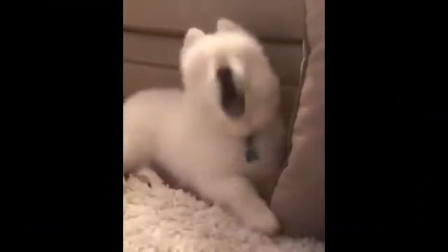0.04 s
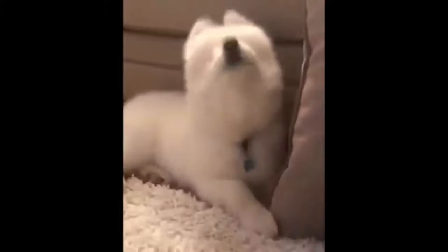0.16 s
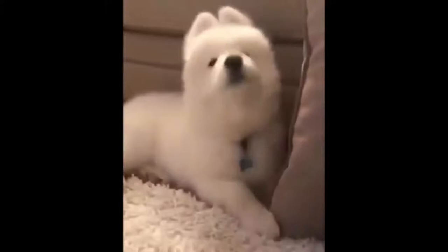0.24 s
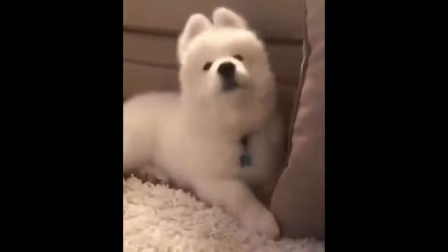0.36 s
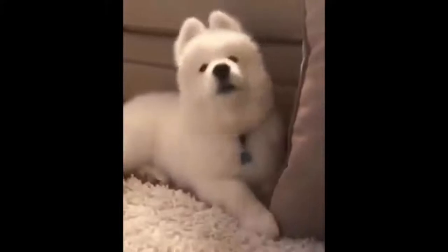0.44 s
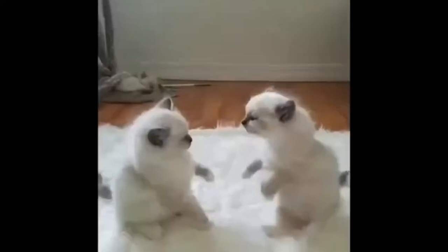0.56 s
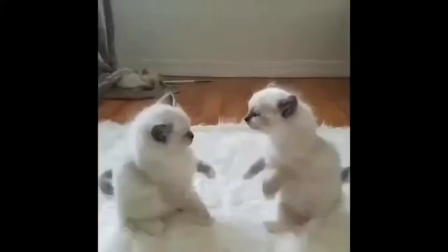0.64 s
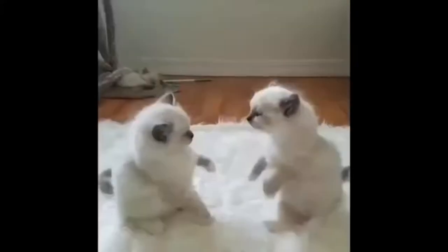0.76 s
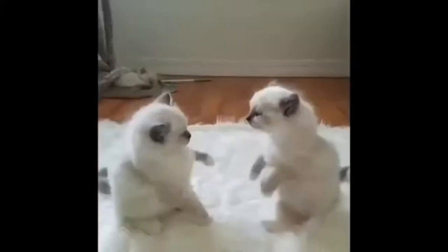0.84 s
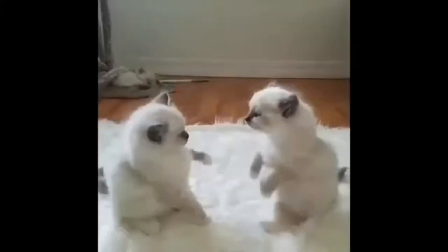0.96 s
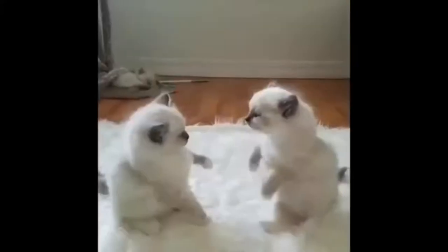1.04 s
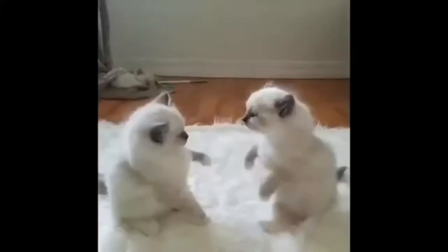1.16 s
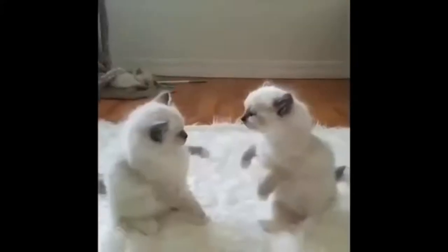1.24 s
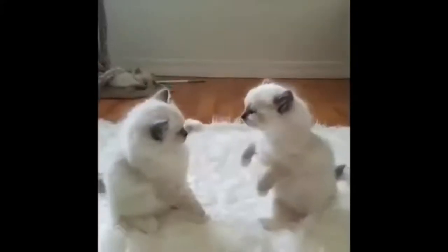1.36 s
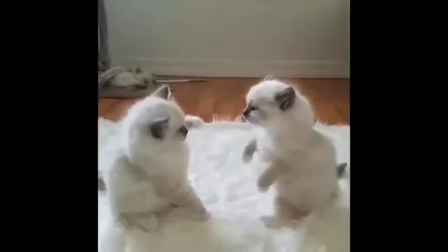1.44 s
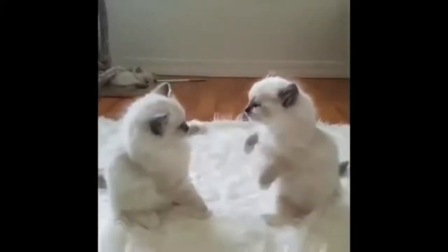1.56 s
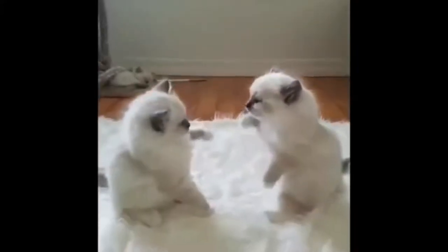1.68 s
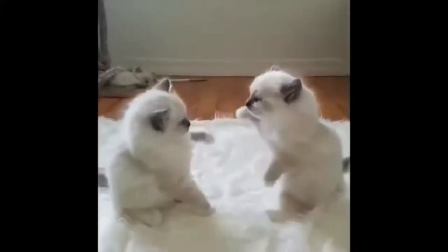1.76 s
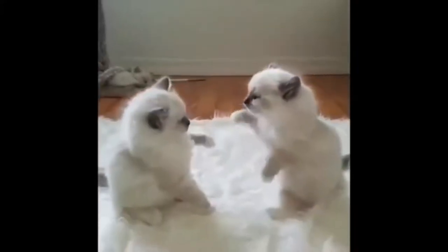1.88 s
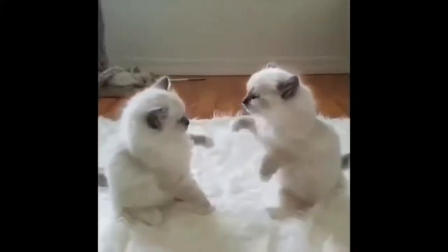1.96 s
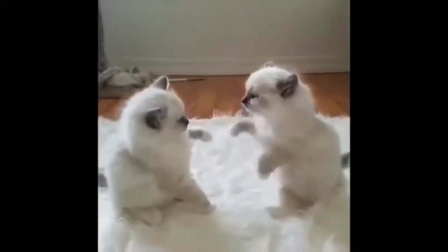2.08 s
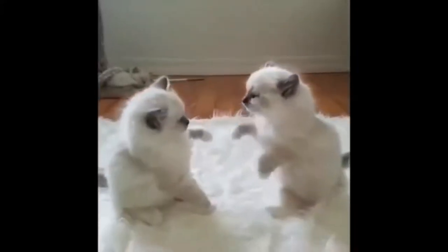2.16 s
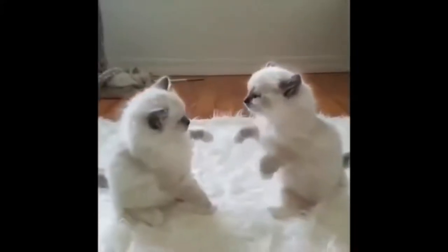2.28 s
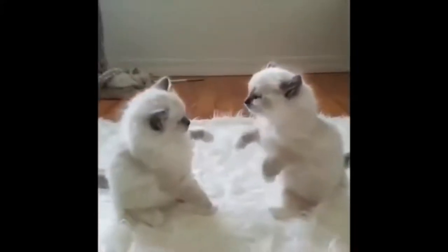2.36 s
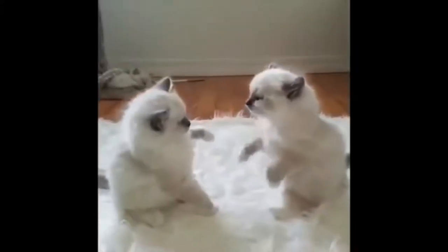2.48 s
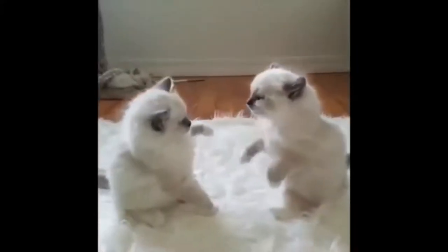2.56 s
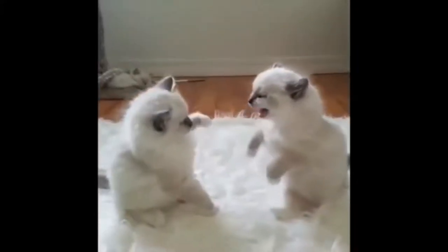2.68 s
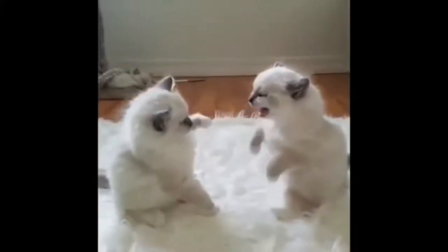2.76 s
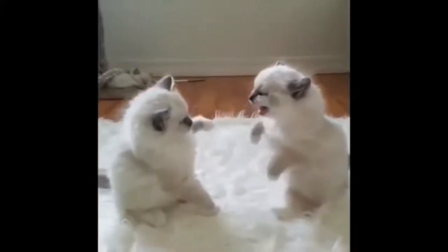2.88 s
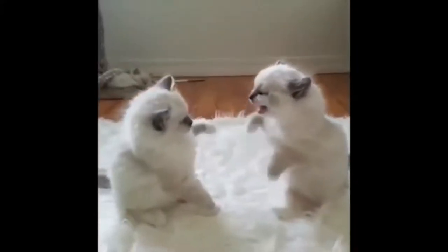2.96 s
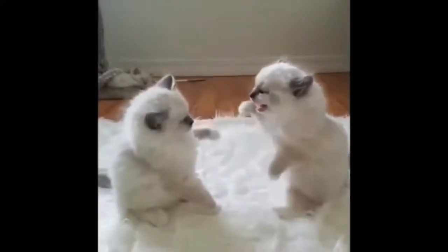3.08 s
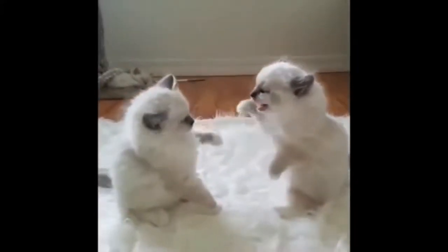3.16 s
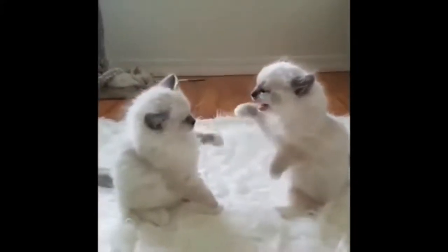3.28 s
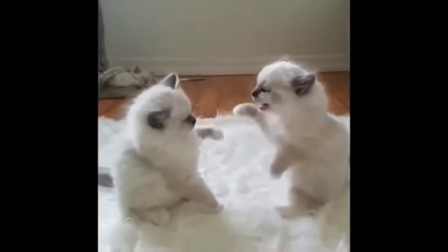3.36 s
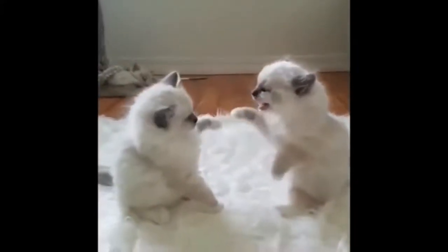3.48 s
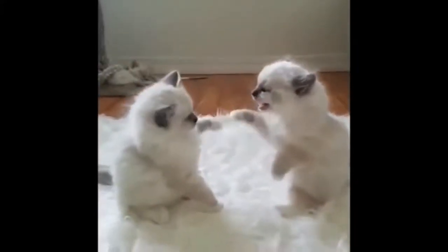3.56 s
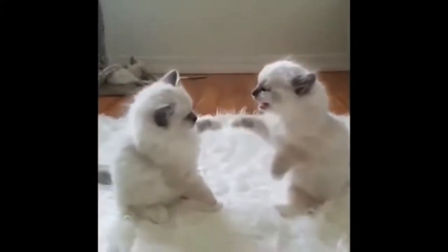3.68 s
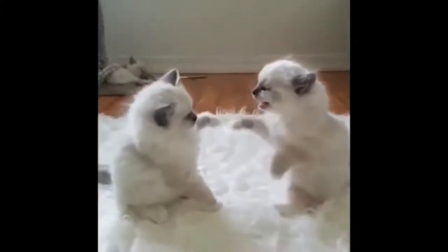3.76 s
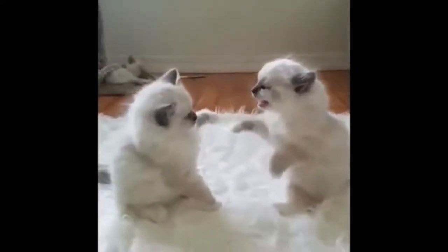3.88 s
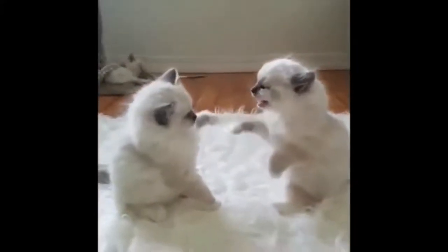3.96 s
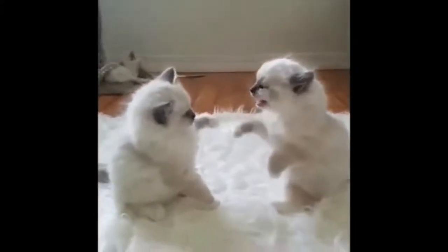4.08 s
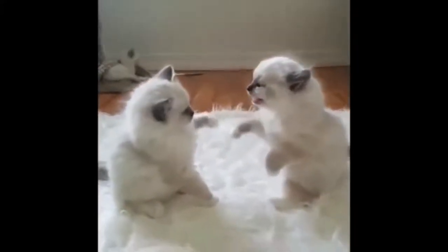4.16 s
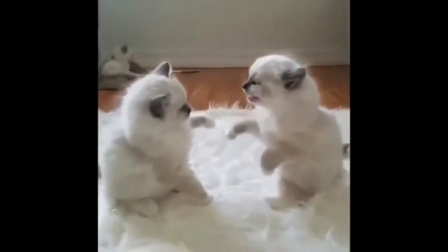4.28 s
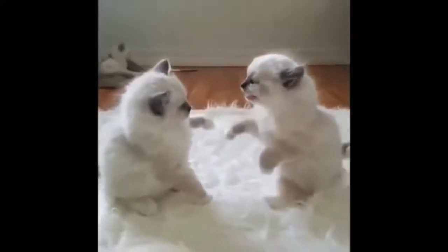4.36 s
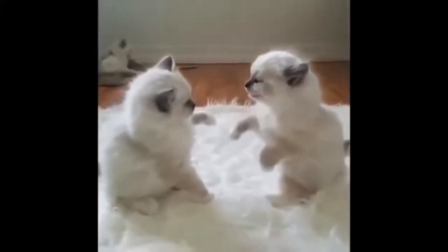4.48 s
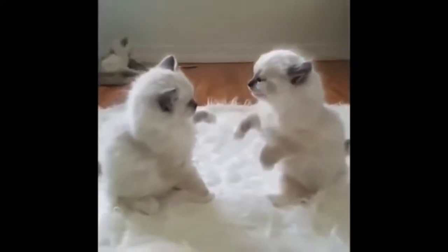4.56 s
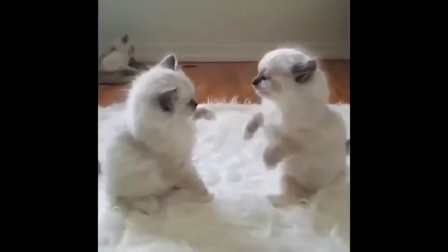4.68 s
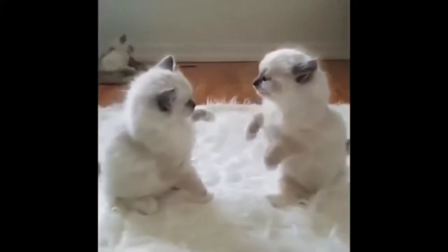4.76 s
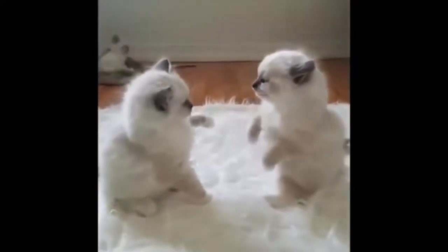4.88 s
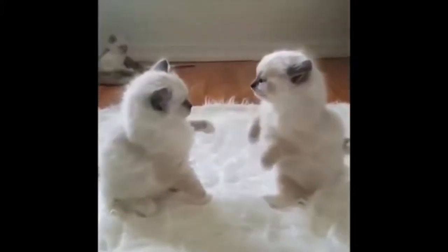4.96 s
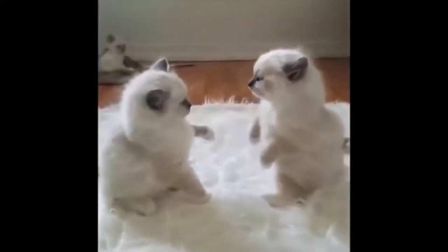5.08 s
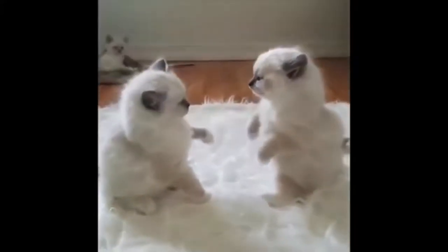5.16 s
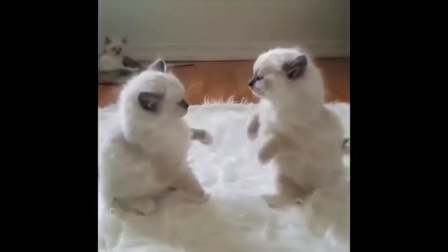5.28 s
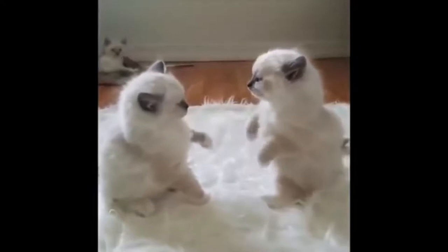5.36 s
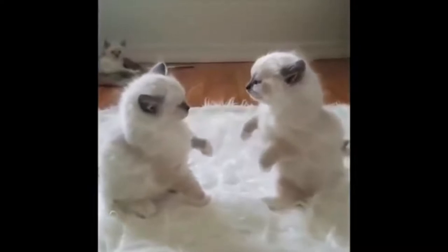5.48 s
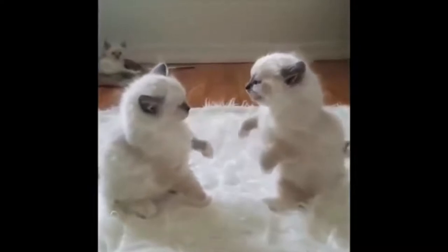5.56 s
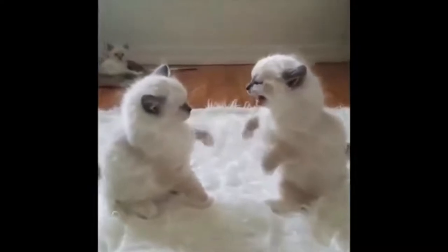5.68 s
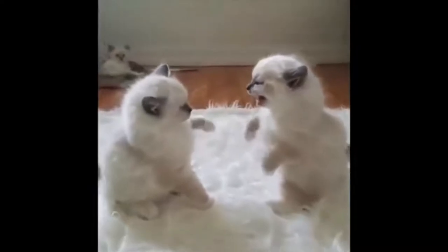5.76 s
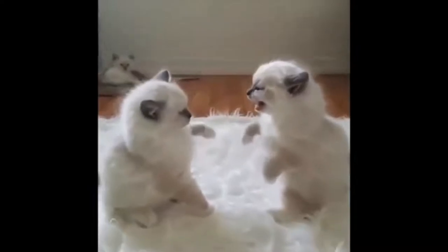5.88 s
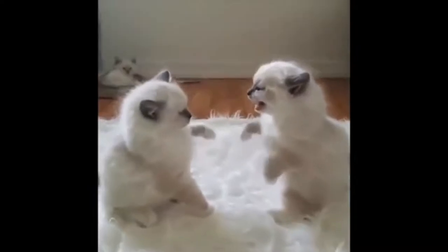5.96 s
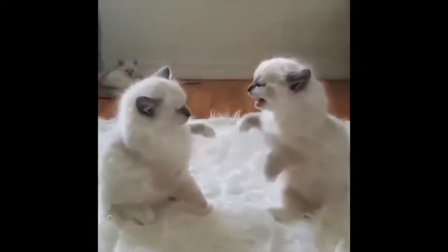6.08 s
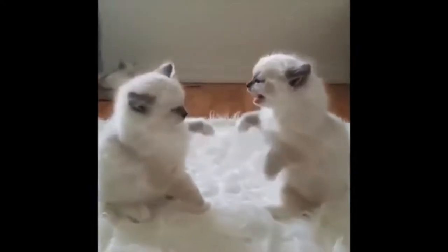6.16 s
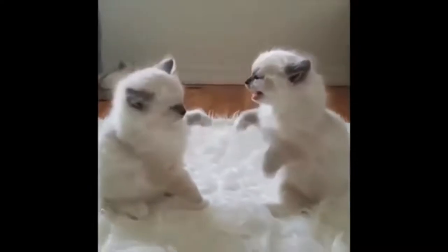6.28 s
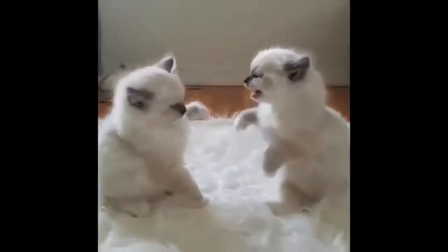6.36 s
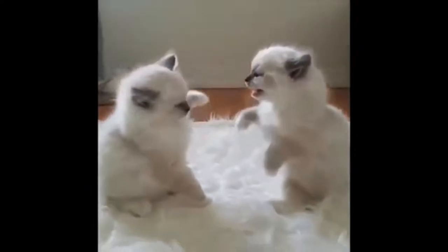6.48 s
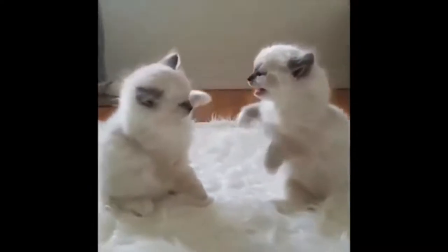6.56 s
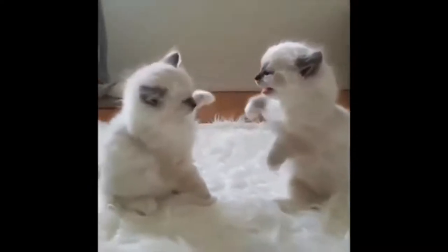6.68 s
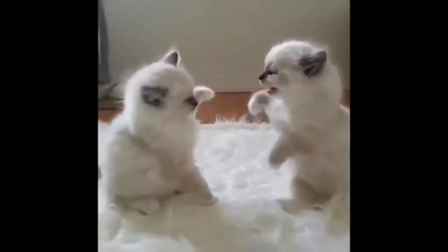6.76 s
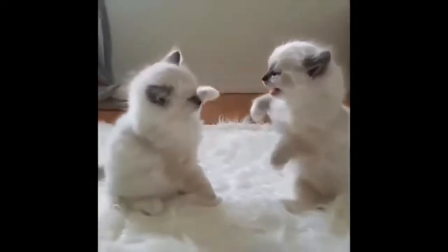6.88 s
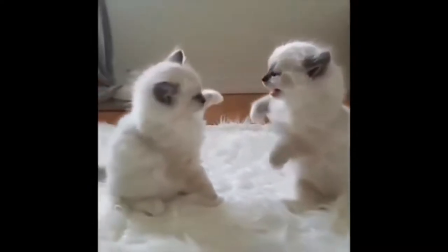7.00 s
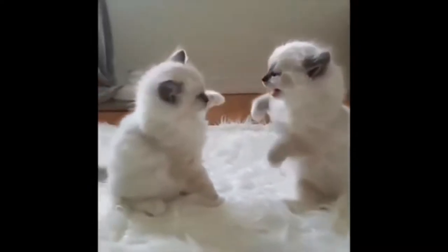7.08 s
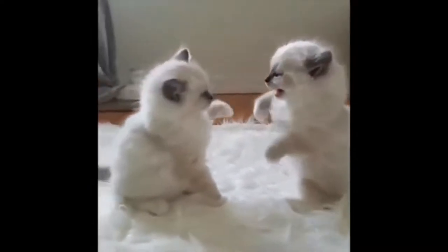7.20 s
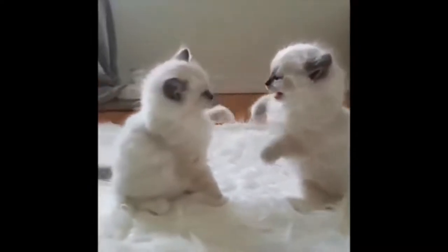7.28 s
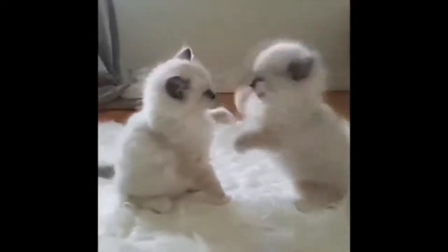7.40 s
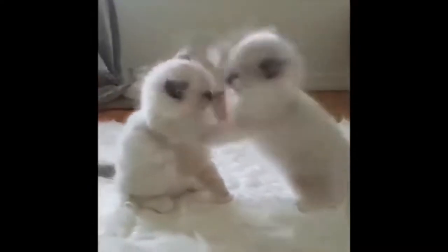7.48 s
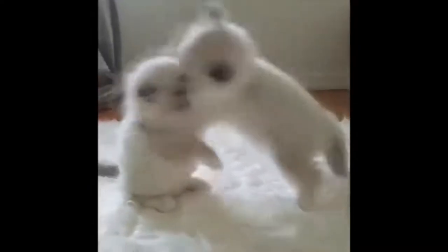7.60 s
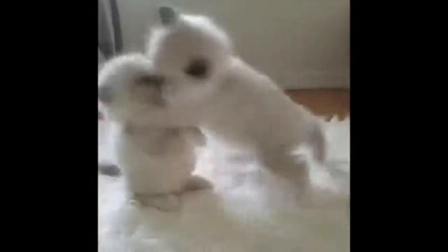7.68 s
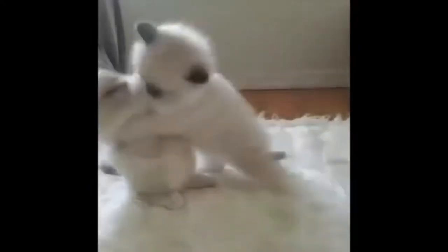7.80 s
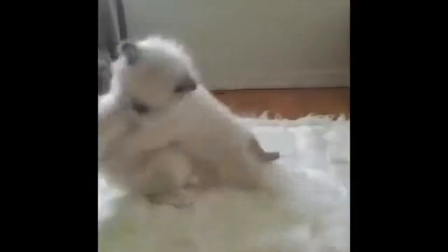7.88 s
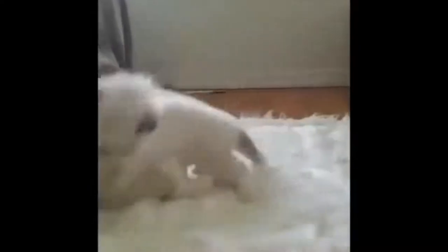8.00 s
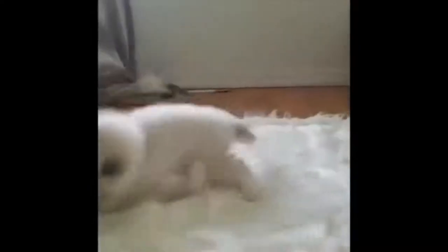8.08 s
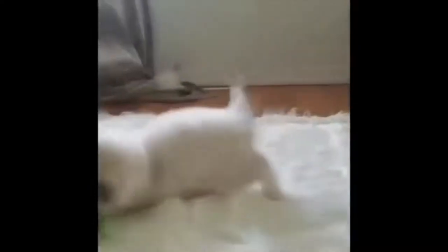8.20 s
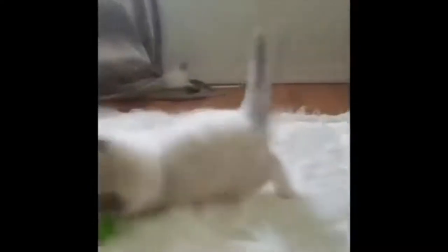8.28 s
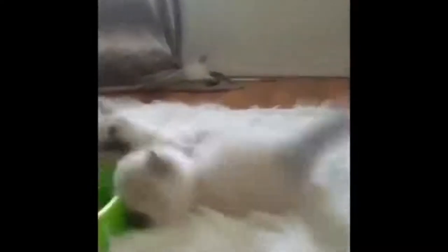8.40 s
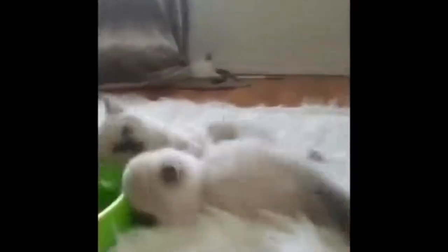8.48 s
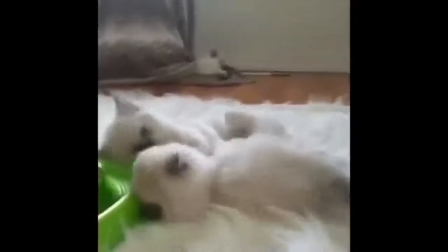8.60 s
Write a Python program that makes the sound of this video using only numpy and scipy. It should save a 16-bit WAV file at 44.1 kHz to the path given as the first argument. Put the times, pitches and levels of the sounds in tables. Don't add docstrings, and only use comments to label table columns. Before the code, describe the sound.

A puppy gives one very loud, short yip that breaks upward; after a brief silence, two faint kitten mews, soft paw pats and a floor thump.

```python
import sys
import numpy as np
from scipy import signal
from scipy.fft import rfft, irfft
from scipy.io import wavfile
from scipy.ndimage import uniform_filter1d, minimum_filter1d

SR = 44100
rng = np.random.default_rng(int(sys.argv[2]) if len(sys.argv) > 2 else 0)


def convert_level_to_amplitude(level_db):
    exponent = np.asarray(level_db, float) / 20
    return 10 ** exponent


def generate_wav(sig):
    pcm = np.round(np.clip(np.atleast_2d(sig).T, -1, 1) * 32767).astype(np.int16)
    wavfile.write(sys.argv[1], SR, pcm)


N = 380731
TIME = np.arange(N) / SR
CUT_START_S, CUT_END_S = .686, .763


def on_log(hz, table):
    f, v = np.transpose(table)
    return np.interp(np.log(np.maximum(hz, 1)), np.log(f), v)


def colour(x, table):
    gain = convert_level_to_amplitude(on_log(np.fft.rfftfreq(x.shape[-1], 1 / SR), table))
    y = irfft(rfft(x) * gain, x.shape[-1])
    return y / y.std()


def band(x, hz, width, order=1):
    edges = max(hz - width / 2, hz / 4), min(hz + width / 2, .45 * SR)
    return signal.sosfilt(signal.butter(order, edges, "band", fs=SR, output="sos"), x)


def walk(rate):
    k = int(SR / rate)
    held = np.repeat(rng.standard_normal(N // k + 1), k)
    return 1.1 * uniform_filter1d(uniform_filter1d(held, k), k)[:N]


def swells(rows):
    return sum(db * np.exp(-((TIME - s) / length) ** 2) for s, length, db in rows)


def add(out, s, x, pan_db=0.):
    i = int(s * SR)
    x = x[:N - i]
    out[:, i:i + len(x)] += x * convert_level_to_amplitude(np.array([[pan_db], [-pan_db]]) / 2)


def room(x, t60, gap_s, dull_hz, channels):
    t = np.arange(int(.9 * SR)) / SR
    noise = rng.standard_normal((channels, len(t)))
    bass = signal.lfilter(*signal.butter(1, 450., fs=SR), noise)
    noise = noise - bass + bass[0]
    low = signal.lfilter(*signal.butter(1, dull_hz, fs=SR), noise)
    tail = low * convert_level_to_amplitude(-60 * t / t60) + (noise - low) * convert_level_to_amplitude(-120 * t / t60)
    tail = tail * np.clip(t / gap_s, 0, 1) ** 2
    energy = (low ** 2 * convert_level_to_amplitude(-120 * t / t60)).sum(1, keepdims=True)
    return signal.fftconvolve(x[None], tail / np.sqrt(energy), axes=1)[:, :N]


def tap(db, hz, width, edge_db):
    t = np.arange(2000) / SR
    ring = band(np.sin(2 * np.pi * hz * t) * np.exp(-np.pi * width * hz * t), hz, 4 * hz)
    edge = band(rng.standard_normal(2000) * np.exp(-1050 * t), 3 * hz, 1.6 * hz, order=2)
    return convert_level_to_amplitude(db) * (ring / np.abs(ring).max() + convert_level_to_amplitude(edge_db) * edge / np.abs(edge).max())


def whistles(rows):
    out = 0
    for s, hz, db, half, glide in rows:
        t = TIME - s
        bend = glide * np.clip(t, -2 * half, 2 * half) ** 2 / 2 + .07 * walk(150)
        envelope = convert_level_to_amplitude(db + 3.5 * walk(150)) * np.exp(-(t / half) ** 2)
        out = out + envelope * np.sin(2 * np.pi * (hz * t + bend))
    return out


def voice(table, wobble, shimmer_db, rate, count, tract, attack, release):
    s, *columns = np.transpose(table)
    hz, level_db, *shape = (np.interp(TIME, s, c) for c in columns)
    phase = 2 * np.pi * np.cumsum(hz * (1 + wobble * walk(rate))) / SR
    out = 0
    for k in range(1, count + 1):
        shimmer = shimmer_db * (walk(rate) + .4 * walk(rate / 4))
        db = level_db + tract(k, k * hz, *shape) + shimmer
        out = out + convert_level_to_amplitude(db) * np.sqrt(2) * np.sin(k * phase - .15 * (k - 1))
    edges = np.clip(np.minimum((TIME - s[0]) / attack, (s[-1] - TIME) / release) + .5, 0, 1)
    return out * edges, np.cos(phase) * edges


# f/Hz, level/dB per Hz
BEDROOM_SPECTRUM = [(15, -56), (25, -26.5), (124, -2.5), (153, -14), (245, -5), (287, -18.5), (318, 2.5),
                    (403, -32.5), (681, -22.5), (737, -28.5), (2460, -23.5), (4620, -32.5), (13200, -38.5)]
# f/Hz, likeness (0-1)
LIKENESS = [(60, 0.97), (130, 0.94), (280, 0.66), (610, 0), (1330, -0.17), (2870, 0.02), (6230, -0.01),
            (13500, 0.05)]
# f/Hz, level/dB
HUM = [(86, -64), (120, -61.5), (425, -73)]
# t/s, length/s, level/dB
STIRS = [
    (1.41, 0.15, 1),
    (2.22, 0.17, 3),
    (3.0, 0.34, 3),
    (4.3, 0.13, 2),
    (4.81, 0.24, 3.5),
    (5.5, 0.19, -1.5),
]
# t/s, length/s, hiss level/dB
HUSHES = [(2.97, 0.13, -4), (3.5, 0.18, -1), (3.95, .15, -0.5), (5.0, .3, 1.5), (5.6, .15, -3),
          (6.0, 0.18, -0.5), (6.35, 0.092, -1.5), (7.0, .15, -2), (7.4, .08, -2), (1.7, .2, 1),
          (7.95, .15, -1)]


def bedroom():
    stir_db = swells(STIRS)
    hum_db = stir_db - 6 * np.exp(-np.maximum(TIME - CUT_END_S, 0) / 0.48)
    hiss_db = 2.85 * stir_db - 3.0 + swells(HUSHES) + 1.2 * walk(6)
    out = 0
    for hz in 32 * 2 ** np.arange(0, 9, .5):
        like = np.clip(on_log(hz, LIKENESS), 0, 1)
        mid, side = band(rng.standard_normal((2, N)), hz, hz / 3)
        high = np.clip(np.log(hz / 400) / np.log(12), 0, 1)
        db = on_log(hz, BEDROOM_SPECTRUM) + (1 - high) * hum_db + high * hiss_db
        db = db + 1.83 * walk(8) + 1.9 * high * walk(25)
        stereo = np.sqrt(1 + like) * mid + np.sqrt(1 - like) * side * np.array([[1], [-1]])
        out = out + convert_level_to_amplitude(db) * stereo
    lines = 0
    for hz, db in HUM:
        lines = lines + convert_level_to_amplitude(db + 3.7 * walk(10)) * np.sin(2 * np.pi * hz * TIME + 1.27 * walk(12))
    return (out / out.std() * convert_level_to_amplitude(-59.0) + lines * convert_level_to_amplitude(hum_db)) * convert_level_to_amplitude(np.array([[-.7], [.7]]))


# f/Hz, level/dB per Hz
DEN_SPECTRUM = [(12, -38.5), (20, -2), (118, -0.5), (611, -20.5), (1590, -23.5), (2330, -31), (3240, -35),
                (4140, -24.5), (5020, -34), (12700, -44), (13800, -56)]
# t/s, length/s, level/dB
SHUFFLES = [
    (.015, 0.0089, 2),
    (.218, 0.084, 5.5),
    (.668, 0.0098, 3),
]


def den_air():
    late = np.maximum(TIME - .33, 0)
    duck_db = (late > 0) * (-1 - 10.5 * np.exp(-late / .07))
    air_db = -47 + swells(SHUFFLES) + duck_db
    return colour(rng.standard_normal(N), DEN_SPECTRUM) * convert_level_to_amplitude(air_db + 1.5 * walk(30))


# centre t/s, f/Hz, level/dB, half length/s,
# glide/(Hz/s)
SQUEAKS = [
    (.8, 3000, -61, 0.0057, 8000),
    (1.0, 2500, -68, 0.0078, 0),
    (1.205, 2450, -65, 0.011, 0),
    (1.57, 1538, -62, .017, -1500),
    (7.51, 2920, -61, .006, 0),
    (4.722, 4850, -58, .007, 0),
]


def squeaks():
    return whistles(SQUEAKS)


# t/s, level/dB, centre f/Hz, fall/s, left minus right level/dB
SWIPES = [(0.779, -72, 8930, 0.077, -4), (1.199, -60.5, 2420, 0.03, -6), (1.385, -62, 7000, 0.072, -8),
          (2.374, -47, 4148, 0.045, -4.5), (2.592, -57.5, 6000, 0.059, -6), (2.62, -51.5, 7910, 0.038, -3),
          (2.836, -66, 2500, 0.017, -12), (6.765, -57.5, 7275, .02, -3), (4.718, -46.5, 8440, 0.016, -6),
          (4.446, -55.5, 9000, .01, 10), (.805, -61, 2500, 0.019, -4), (4.88, -47.5, 415, 0.019, -5),
          (7.501, -51, 4978, 0.013, -7), (8.186, -53.5, 8900, 0.04, 0), (8.19, -44.5, 1150, 0.059, 0),
          (8.494, -56, 2400, 0.024, -2), (8.499, -49, 448, 0.061, 0)]
# t/s, level/dB, centre f/Hz, length/s, left minus right level/dB
BRUSHES = [(1.537, -65.5, 2800, 0.043, -4), (2.196, -62, 3400, 0.14, -5), (2.401, -52, 889, 0.042, 0),
           (3.17, -62, 4900, 0.047, -2), (4.157, -63, 5960, 0.04, -3), (4.557, -56, 4600, 0.026, -3),
           (4.659, -54, 60, 0.049, 17), (4.66, -55, 8960, 0.035, 6), (4.676, -60.5, 484, 0.033, 21),
           (4.881, -45.5, 81.5, 0.043, 0), (5.201, -65.5, 11100, 0.17, -6), (6.809, -63.5, 7240, 0.02, -1),
           (4.792, -50, 149.8, 0.028, -1), (4.929, -59, 647, 0.023, 0), (8.235, -45, 40.12, 0.061, -2),
           (7.537, -56, 5300, 0.042, -1), (7.578, -60.5, 850, 0.054, 2), (8.07, -80, 5000, .04, 1),
           (8.33, -49, 205.4, 0.14, 1)]


def rustles():
    out = np.zeros((2, N))
    t = np.arange(-SR // 4, SR // 2) / SR
    rows = [(0.023 * r[3] + 6.3 / r[2], *r) for r in SWIPES]
    rows += [(0.9 * r[3], *r) for r in BRUSHES]
    for rise, s, db, hz, fall, pan_db in rows:
        shape = np.where(t < 0, np.exp(-(t / rise) ** 2), np.exp(-np.abs(t) / fall))
        noise = rng.standard_normal((4, len(t)))
        grain = convert_level_to_amplitude(1.94 * uniform_filter1d(noise[3], 90) * np.sqrt(90))
        puff = band((noise[:2] + 250 / hz * noise[2]) * grain, hz, 1.0 * hz, order=2)
        puff = puff / puff.std() * shape * convert_level_to_amplitude(db + np.array([[pan_db], [-pan_db]]) / 2)
        i = int(s * SR) - SR // 4
        out[:, i:i + len(t)] += puff[:, :N - i]
    return out


PATS = [
    (2.76, -33, 627, 3),
    (3.05, -45, 600, 2),
    (6.2182, -26, 540, 3),
    (6.293, -33, 600, 4),
    (6.2993, -37.5, 499, 1.5),
    (7.79, -43.5, 400.4, 2),
    (7.834, -47, 695, 5),
    (7.842, -36, 600, 3.5),
    (8.492, -38, 444, -5),
]
CLAWS = [
    (1.787, -47, 898, 1),
    (1.847, -43, 891, 2),
    (4.545, -40.5, 788.5, 1),
    (5.299, -46.5, 712, -6),
    (4.63, -48, 600, 10),
    (7.771, -44, 990, 9),
    (7.9, -37.5, 826, 5),
]
TICKS = [
    (2.592, -48, 4500, -4),
    (2.84, -53, 2989, -4),
    (4.717, -47, 4800, -4),
    (5.798, -52.5, 3253, 0),
    (7.502, -40, 4300, -3),
    (7.527, -38, 6200, -3),
    (7.56, -50, 1999, 0),
    (8.488, -40, 2512, 1),
    (8.508, -48, 2300, 0),
    (2.373, -46, 4200, -4),
]
SLAPS = [
    (3.095, -41, 600, 1.8),
    (8.488, -33, 505, 0.46),
]
LANDING = [
    (8.2028, -14, 298, 3),
]
NAIL = [
    (4.4061, -38, 2500, 20),
    (4.408, -24, 2280, 22.5),
    (4.415, -35, 2060, 8),
    (4.439, -32, 2520, 20.5),
    (5.398, -45.5, 195, -20.5),
]
# f/Hz, level/dB, t60/s
BOARDS = [(177.5, -9, 0.18), (230.4, 3.5, 0.12), (367.6, -3.5, 0.15), (416, -12, 0.16), (600, -8.5, 0.076),
          (850, -21.5, 0.066), (1180, -42, .08)]
# (width over ring frequency, sharp edge dB)
PAT, CLAW, TICK = (0.73, -20), (1.15, -10), (0.12, -13)
SLAP, LAND, FLICK = (0.64, -14.5), (0.99, -50), (0.32, -11.5)


def floor_thump():
    t = np.arange(SR // 2) / SR
    modes = sum(convert_level_to_amplitude(db - 60 * t / t60) * np.sin(2 * np.pi * hz * t) for hz, db, t60 in BOARDS)
    modes = modes * np.clip(t / 0.0018, 0, 1)
    modes = modes * convert_level_to_amplitude(-11 * np.clip((t - .021) / 0.0018, 0, 1))
    push = np.hanning(int(0.00097 * SR))
    return -convert_level_to_amplitude(-15) * np.convolve(modes, push / push.sum())


def knocks():
    out, near = np.zeros((2, 2, N))
    for rows, kind in (PATS, PAT), (CLAWS, CLAW), (TICKS, TICK), (SLAPS, SLAP), (LANDING, LAND):
        for s, db, hz, pan_db in rows:
            add(out, s, tap(db, hz, *kind), pan_db)
    for s, db, hz, pan_db in NAIL:
        add(near, s, tap(db, hz, *FLICK), pan_db)
    add(out, 8.1805, floor_thump(), 3.5)
    out = signal.sosfilt(signal.butter(2, 140., "high", fs=SR, output="sos"), out)
    return near + out + convert_level_to_amplitude(-15) * room(out.mean(0), 0.47, 0.0066, 1800.0, channels=2)


# f/Hz, level/dB
MEW_THROAT = [(740, -14), (900, -3), (1600, -1), (2500, -8.5), (4500, -10.5), (6800, -16.5), (8300, -15),
              (9800, -33.5), (12500, -31)]
# f/Hz, width (log ratio), level/dB
NODES = [(830, 0.021, -8.5), (988, 0.011, -6), (1059, 0.0073, -16), (1040, 0.024, 3.5), (1450, 0.088, 5.5),
         (1890, 0.096, -2), (2036, 0.016, 0.5), (2258, 0.02, 10), (4460, 0.0088, -5.5)]


def small_mouth(k, hz, open_db, bright_db, palate_hz, nose_hz):
    bell = lambda x, centre, width: np.exp(-(np.log(x / centre) / width) ** 2)
    top = np.clip(np.log2(hz / 4000), 0, 1)
    strain, dull = np.maximum(bright_db, 0), np.minimum(bright_db, 0)
    db = on_log(hz, MEW_THROAT) + open_db * bell(hz, 3250, .12) + 6.5 * bell(hz, palate_hz, .11)
    db = db + 7 * strain * bell(hz, 10500, .18) - 7 * strain * bell(hz, 7300, .19)
    if k < 6:
        db = db + sum(node_db * bell(hz, centre, width) for centre, width, node_db in NODES)
    return db + bright_db * np.sqrt(top) + (-6 + 0.7 * dull) * bell(hz, nose_hz, 0.076)


# t/s, f/Hz
MEW_PITCH = [
    [(2.84, 1098), (2.87, 1140), (2.915, 1103), (2.965, 1152), (3.05, 1097), (3.14, 1080), (3.19, 1113), (3.32, 1029), (3.4, 1029)] + [(3.55, 1013), (3.7, 990.5), (3.88, 882.6), (4.04, 900), (4.1, 888), (4.2, 836.4), (4.27, 831.5), (4.33, 769)] + [(4.4, 746), (4.49, 719), (4.535, 669), (4.57, 632)],
    [(5.795, 1051), (5.832, 1068), (5.86, 1107), (5.895, 1066), (5.96, 1055), (6.035, 1061), (6.07, 1032), (6.22, 1040), (6.4, 1019)] + [(6.52, 941), (6.75, 830), (6.9, 863.6), (7.05, 864.6), (7.14, 887), (7.19, 932), (7.25, 952), (7.38, 1004), (7.53, 1011)] + [(7.58, 976)],
]
# t/s, level/dB, opening/dB, brightness/dB, palate f/Hz, nasal dip f/Hz
MEW_MOUTH = [
    [(2.84, -58.5, 15.5, 1, 5600, 4300), (2.97, -61, 17, 1, 5580, 4550), (3.11, -62, 12, -3, 5520, 4190), (3.2, -65.5, -4, -7, 5136, 3500), (3.4, -63, 1.5, 1, 5200, 6350), (3.57, -62.5, -3, 1, 5050, 3000), (3.75, -64, 10, 1, 5430, 2850)] + [(3.9, -63, 4, 2.5, 5280, 2665), (4.12, -65, 14, 2, 5300, 2622), (4.25, -65, 4, -7, 3284, 2490), (4.4, -62.5, 3.5, -22, 2966, 2200), (4.57, -62.5, -2, -20, 2700, 1950)],
    [(5.795, -57.5, 11, 0.5, 5410, 4220), (5.89, -59.5, 9.5, 0, 5640, 4350), (6.06, -61.5, -3, -3.5, 5650, 5160), (6.2, -66, -8, -4.5, 6200, 5230), (6.4, -63.5, -7, -5, 6136, 4360), (6.55, -69, -10, -4, 5600, 2800), (6.75, -67.5, 0, -3, 4210, 2500)] + [(6.9, -66.5, -2, -7, 4320, 2600), (7.12, -65.5, -17, -2, 4420, 5234), (7.17, -68, -8, -3, 6250, 3696), (7.27, -64, -12, -9, 6550, 3860), (7.38, -65, -7, -1, 5930, 4000), (7.485, -62, -9, 0.5, 6020, 4005), (7.58, -66.5, -10, -27, 5990, 4030)],
]


def kitten():
    mew = 0
    for pitch, mouth in zip(MEW_PITCH, MEW_MOUTH):
        (s, hz), (at, *columns) = np.transpose(pitch), np.transpose(mouth)
        times = np.sort(np.r_[s, at])
        shape = (np.interp(times, at, c) for c in columns)
        table = np.transpose([times, np.interp(times, s, hz), *shape])
        phrase, _ = voice(table, wobble=.004, shimmer_db=3.3, rate=80, count=13,
                          tract=small_mouth, attack=0.018, release=0.038)
        mew = mew + phrase
    dull = 1 / (1 + (np.fft.rfftfreq(N + 1, 1 / SR) / 2330) ** 4)
    delayed = np.interp(TIME - 0.0056, TIME, mew)
    mew = mew + convert_level_to_amplitude(-12.5) * irfft(rfft(delayed, N + 1) * dull, N + 1)[:N]
    direct = mew * convert_level_to_amplitude(np.array([[-1.2], [1.2]]))
    return direct + convert_level_to_amplitude(-12) * room(mew, .3, .004, 3000., channels=2)


def mask(x):
    mask_from_hz = 3400
    hz, _, z = signal.stft(x, SR, nperseg=2048, noverlap=1536)
    power = uniform_filter1d(np.abs(z).mean(0) ** 2, size=3, axis=1)
    peak = -minimum_filter1d(-power, size=45, axis=0)
    loudest = power[(hz > 2900) & (hz < 3700)].max(0)
    floor = np.maximum(peak * convert_level_to_amplitude(2 * -16), loudest * convert_level_to_amplitude(2 * -32))
    keep = (power > floor) | (hz[:, None] < mask_from_hz)
    lucky = rng.random((len(hz) // 20 + 1, z.shape[2] // 5 + 1)) > .14
    heard = np.kron(lucky, np.ones((20, 5), bool))[:len(hz), :z.shape[2]]
    keep &= heard | (hz[:, None] < 2 * mask_from_hz)
    return signal.istft(z * keep, SR, nperseg=2048, noverlap=1536)[1][:, :N]


# t/s, f/Hz, level/dB, t60/s
TAG = [
    (.366, 4150, -52, .2),
    (.382, 8300, -55, .12),
    (.3, 3420, -52, .35),
    (.25, 2135, -47, .6),
]


def collar_tag():
    out = np.zeros((2, N))
    t = np.arange(SR // 2) / SR
    for s, hz, db, t60 in TAG:
        add(out, s, convert_level_to_amplitude(db - 60 * t / t60) * np.clip(t / 0.0034, 0, 1) * np.sin(2 * np.pi * hz * t))
    return out[0]


# t/s, peak level/dB, ring f/Hz, width f/Hz
SMACKS = [
    (0.114, -52, 12630, 2980),
    (.132, -53.5, 11140, 4933),
    (.155, -49.5, 12510, 4000),
    (0.2056, -30.5, 2895, 448.8),
    (0.207, -35.5, 2156, 400),
    (0.2049, -38, 3850, 400),
    (.206, -42, 6205, 2997),
    (0.207, -38.5, 11500, 4010),
]


def mouth_clicks():
    out = np.zeros((2, N))
    t = np.arange(400) / SR
    for s, db, hz, width in SMACKS:
        click = band(rng.standard_normal(400) * np.exp(-t / 0.0019), hz, width)
        add(out, s, click * convert_level_to_amplitude(db) / np.abs(click).max())
    return out[0]


# centre t/s, f/Hz, level/dB, half length/s,
# glide/(Hz/s)
NOSE_WHISTLES = [
    (0.3744, 8330, -31.5, .0065, -7000),
    (0.134, 1400, -52.5, 0.02, -1500),
    (0.36, 2600, -56, .025, 299.5),
    (0.137, 2540, -63, .015, 0),
    (0.114, 710, -59, 0.023, 0),
    (.03, 710, -57, .015, 0),
]


def nose_air():
    yawn = band(rng.standard_normal(N), 4499.0, 5500.0, order=2) * convert_level_to_amplitude(-56.0)
    return yawn * np.exp(-((TIME - .19) / 0.088) ** 2) + whistles(NOSE_WHISTLES)


# f/Hz, level/dB per Hz
RASP_SPECTRUM = [(3800, -40), (4500, -27), (5300, -14), (6400, -14), (7600, -5), (9400, -1), (11000, 0),
                 (13700, -4), (14100, -40)]


def rasp(cycle):
    attack_s, hold_s = 0.018, 0.06486
    since = TIME - .238
    held = np.clip((since - attack_s) / hold_s, 0, 1)
    db = -38.5 - 18 * np.clip(1 - since / attack_s, 0, 1) - 3 * held
    db = db - 399.5 * np.maximum(since - attack_s - hold_s, 0)
    pulses = 9 * np.exp(150 * (np.minimum(cycle, 1) - 1)) * (TIME < .305)
    hiss = colour(rng.standard_normal(N) * (1 + .8 * cycle) + pulses, RASP_SPECTRUM)
    breath = band(rng.standard_normal(N), 1896.4, 2600.0, order=3) * convert_level_to_amplitude(15.5)
    throat = band(rng.standard_normal(N), 3170.0, 280.4, order=2) * convert_level_to_amplitude(29.5)
    throat = throat * np.exp(-((TIME - .262) / 0.012) ** 2)
    return (hiss + breath + throat) * convert_level_to_amplitude(db) * np.clip(since / .004, 0, 1)


def muzzle(k, hz, mouth_hz, third_db):
    near = lambda centre: 1 / (1 + ((hz - centre) / 290) ** 2)
    slope = -18.5 * np.log2(k) - 31 * np.maximum(np.log2(hz / 3500), 0)
    lift = (k > 1) * (16.5 * near(mouth_hz) + 15 * near(2 * mouth_hz))
    return slope + lift + (k == 3) * third_db + (k == 5) * 5


# t/s, pitch f/Hz, level/dB, mouth resonance f/Hz, third partial level/dB
YIP = [
    [(.237, 978, -44, 3003, -0.5), (.242, 996, -31, 3080, 0), (.2445, 1354, -13.5, 3288, -6.5),
     (.2478, 1320, -24, 3320, -6)],
    [(.2455, 855, -28, 1743, 0), (.257, 849, -7.5, 1744, 0), (.27, 854.4, -8, 1770, 3.5),
     (.281, 853.3, -7, 1870, 8), (.292, 860, -5, 2002, 14.5), (.3, 863, -4.5, 2097, 20),
     (.3048, 896, -5.5, 2300, 20), (.307, 930, -8.5, 2703, 0.5)],
    [(.306, 1307, -6.5, 2304, -10), (.3085, 1279, -6, 2208, -10), (.3185, 1207, -5, 2102, -10),
     (.322, 1155, -17.5, 1995, -10), (.335, 1180, -58.5, 1987, -10)],
]


def yip():
    parts = [voice(part, wobble=0.003, shimmer_db=-0.04, rate=150, count=5, tract=muzzle,
                   attack=.002, release=.002) for part in YIP]
    return np.sum(parts, axis=0)


# lag t/s, level/dB
FURNITURE = [
    (.028, -13.5),
    (.046, -22),
    (.062, -23.5),
]


def den_echo(dry):
    echo = convert_level_to_amplitude(-25) * room(dry, .16, 0.018, 1300., channels=1)[0]
    echo = echo + convert_level_to_amplitude(-26.5) * room(dry, 0.73, 0.029, 1300., channels=1)[0]
    thin = band(dry, 1300., 600., order=2)
    echo = echo + sum(convert_level_to_amplitude(db) * np.interp(TIME - lag, TIME, thin) for lag, db in FURNITURE)
    echo = signal.lfilter(*signal.butter(1, 1798, fs=SR), echo)
    t = np.arange(SR // 2) / SR
    mode = convert_level_to_amplitude(-60 * t / 0.24) * np.sin(2 * np.pi * 860 * t) * np.clip(t / 0.05, 0, 1)
    ring = signal.fftconvolve(dry, mode)[:N]
    return echo + convert_level_to_amplitude(-15) * ring / np.abs(ring).max()


def puppy():
    tone, cycle = yip()
    dry = mouth_clicks() + tone + rasp(cycle)
    loud = dry + den_echo(dry) + den_air() + collar_tag() + nose_air()
    peak = -minimum_filter1d(-np.abs(loud), size=300)
    loud = loud * uniform_filter1d(np.minimum(1, .99 / peak), size=150)
    return signal.sosfilt(signal.ellip(8, .2, 60, 13950, fs=SR, output="sos"), loud)


def scene():
    before = np.clip((CUT_START_S - TIME) / 0.0023, 0, 1)
    after = np.clip((TIME - CUT_END_S) / 0.0019, 0, 1)
    second = mask(bedroom() + squeaks() + rustles() + kitten()) + knocks()
    second = signal.sosfilt(signal.ellip(8, .2, 60, 13100, fs=SR, output="sos"), second)
    return puppy() * before + second * after


def low_pass(x):
    return signal.sosfilt(signal.butter(12, 14110, fs=SR, output="sos"), x)


def record(dry):
    return low_pass(dry)


dry = scene()
out = record(dry)
generate_wav(out)
```